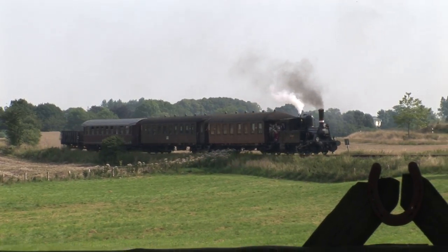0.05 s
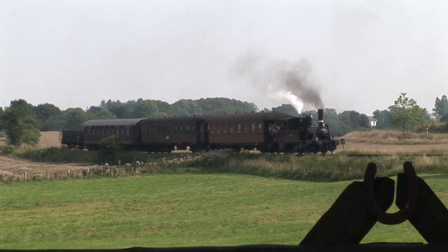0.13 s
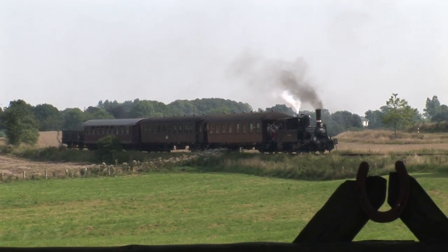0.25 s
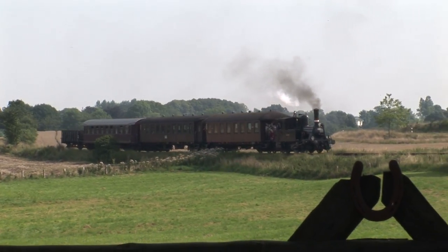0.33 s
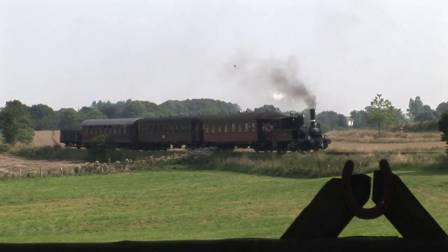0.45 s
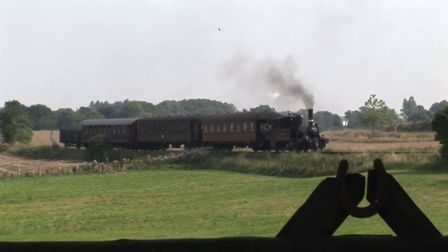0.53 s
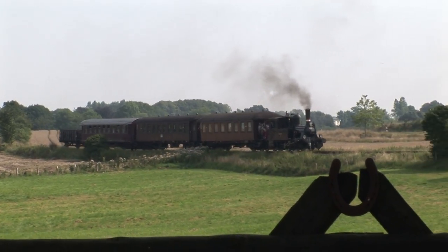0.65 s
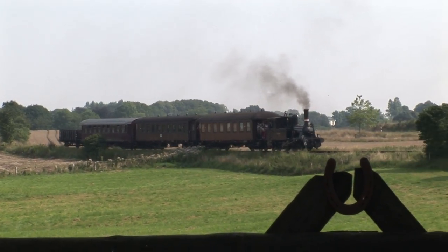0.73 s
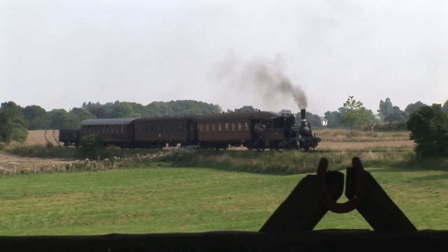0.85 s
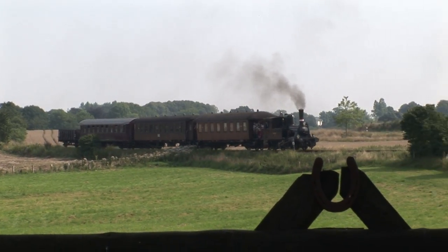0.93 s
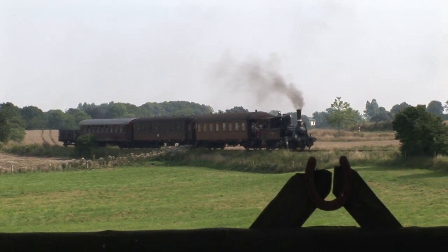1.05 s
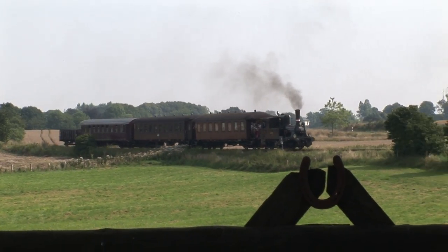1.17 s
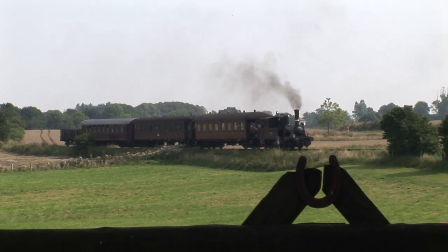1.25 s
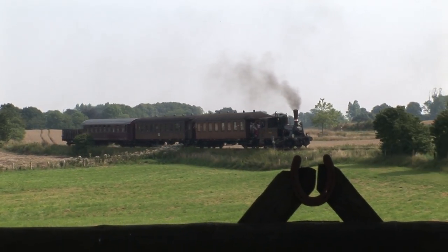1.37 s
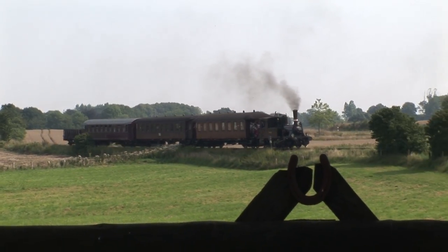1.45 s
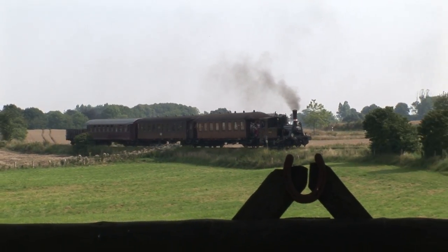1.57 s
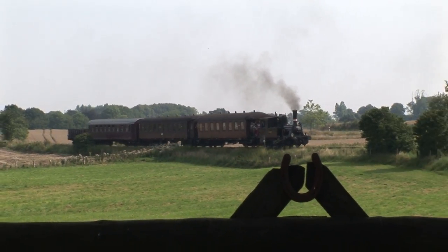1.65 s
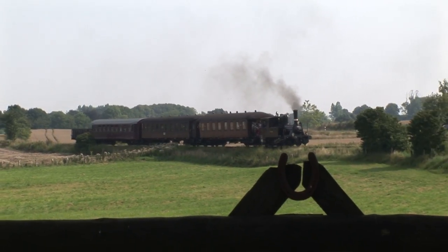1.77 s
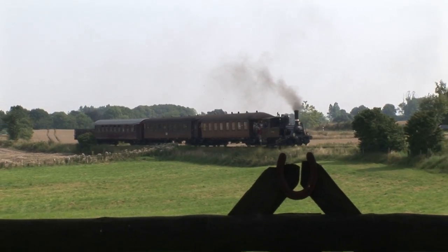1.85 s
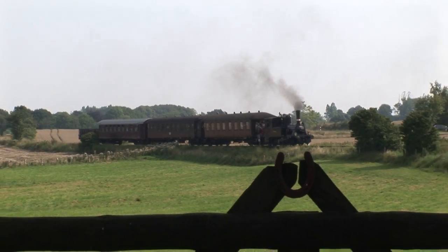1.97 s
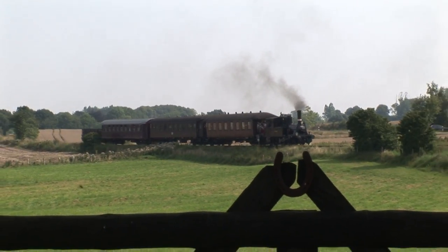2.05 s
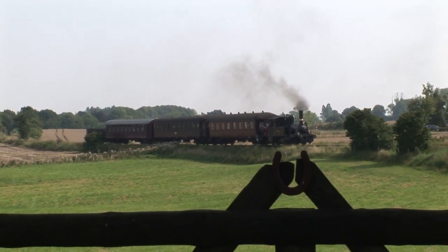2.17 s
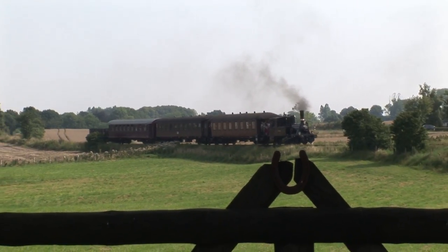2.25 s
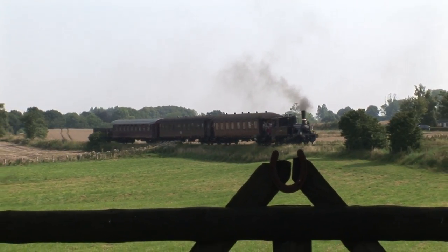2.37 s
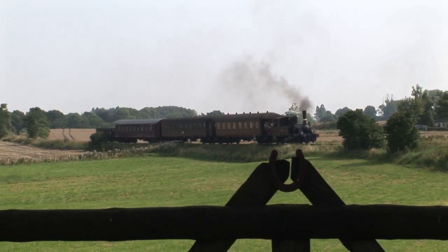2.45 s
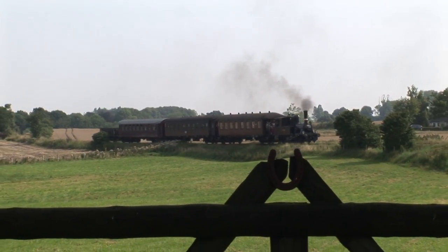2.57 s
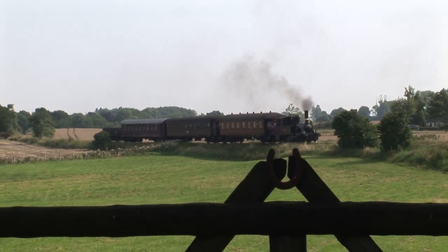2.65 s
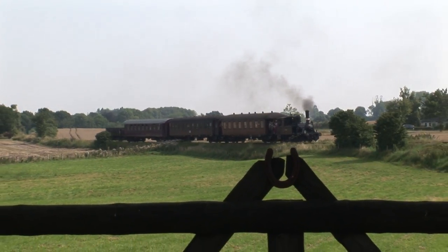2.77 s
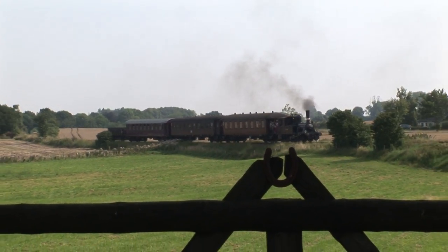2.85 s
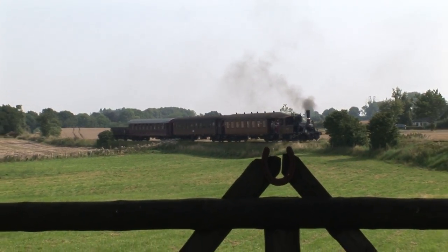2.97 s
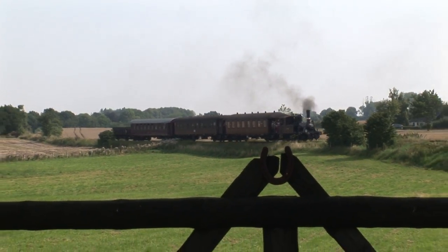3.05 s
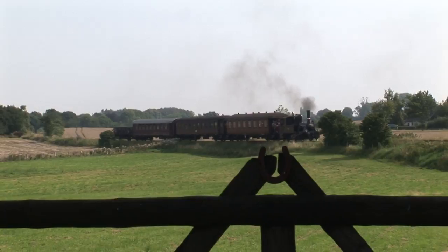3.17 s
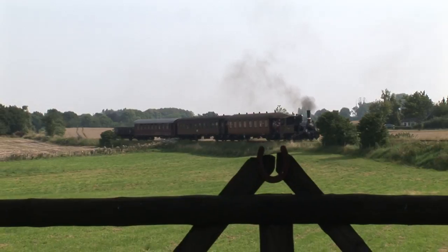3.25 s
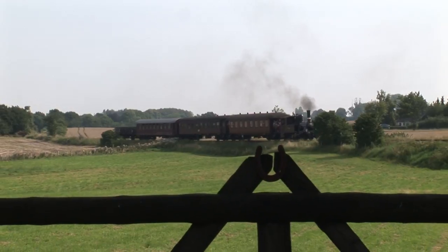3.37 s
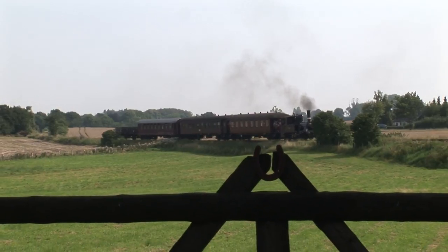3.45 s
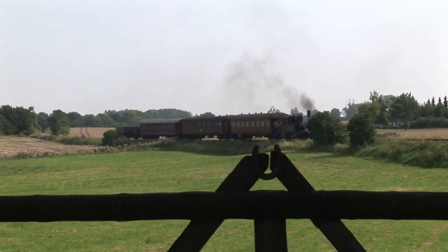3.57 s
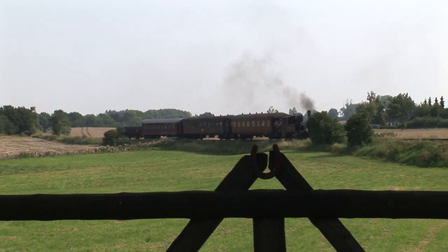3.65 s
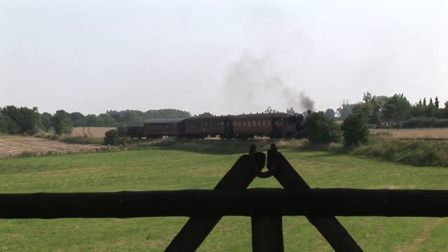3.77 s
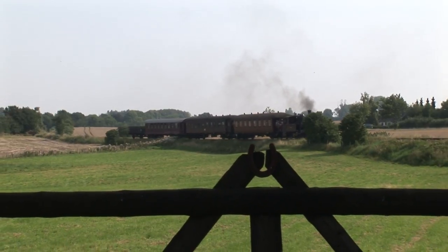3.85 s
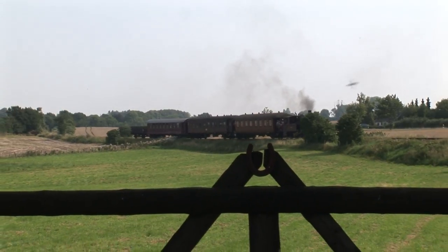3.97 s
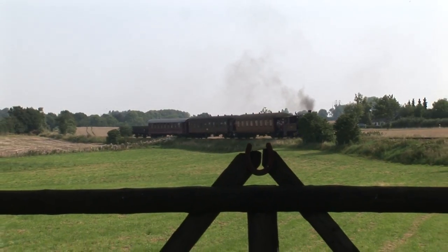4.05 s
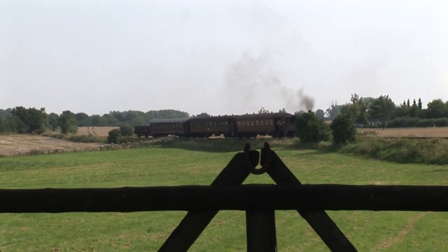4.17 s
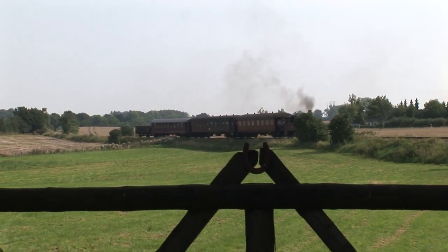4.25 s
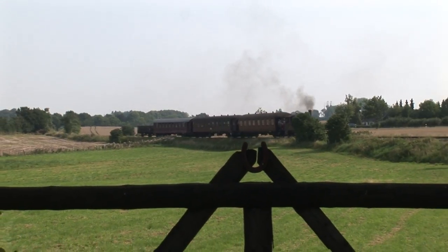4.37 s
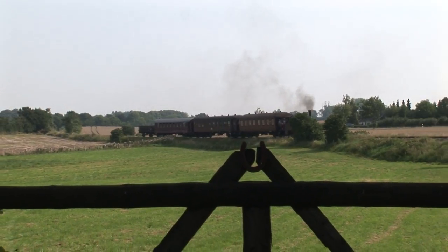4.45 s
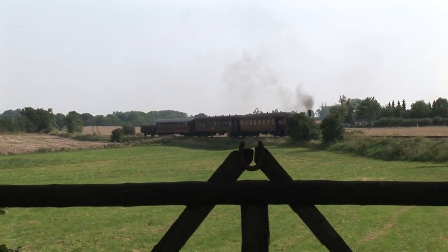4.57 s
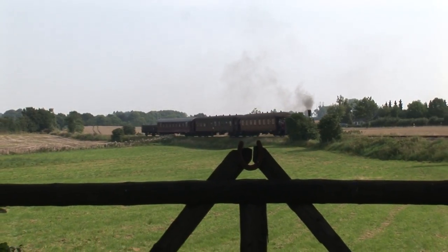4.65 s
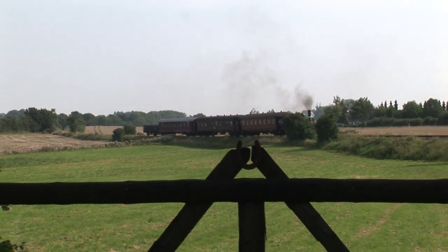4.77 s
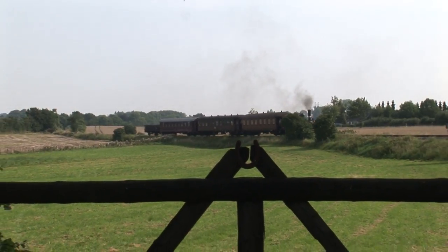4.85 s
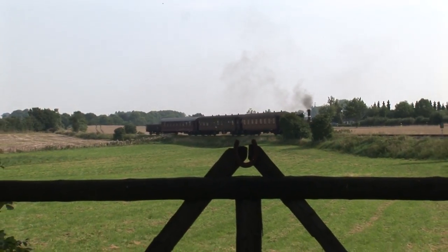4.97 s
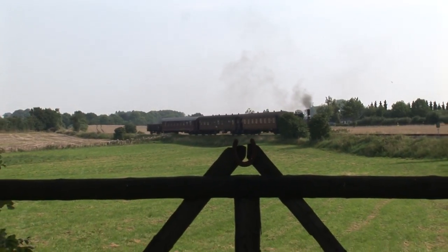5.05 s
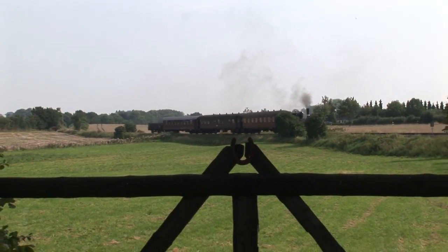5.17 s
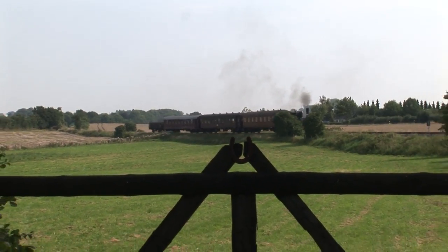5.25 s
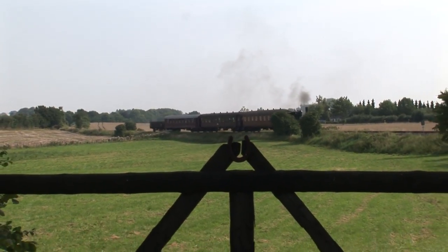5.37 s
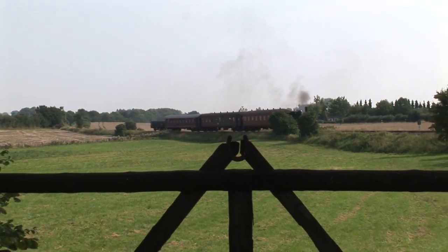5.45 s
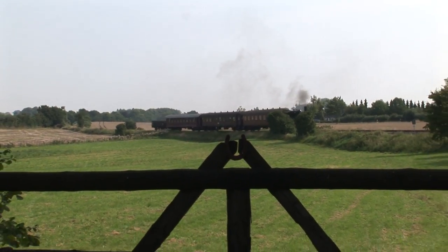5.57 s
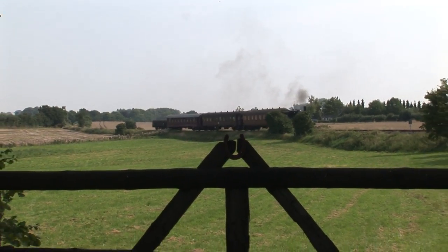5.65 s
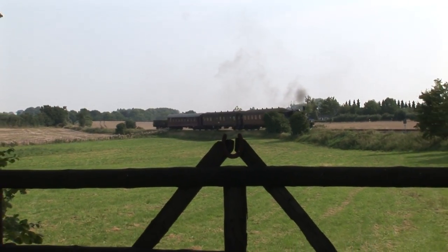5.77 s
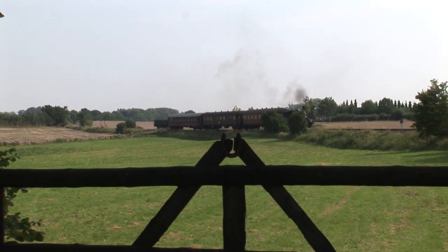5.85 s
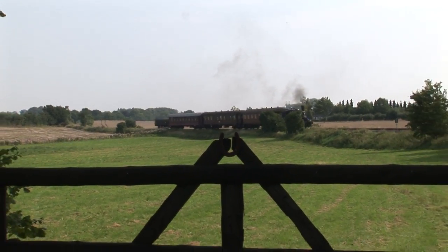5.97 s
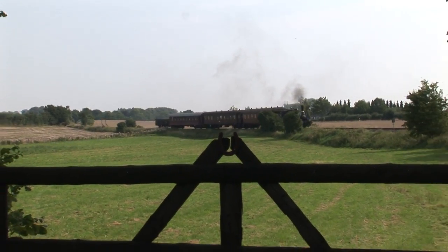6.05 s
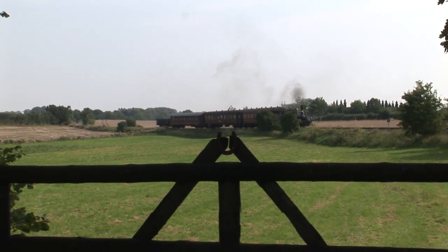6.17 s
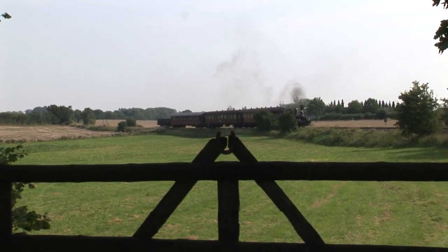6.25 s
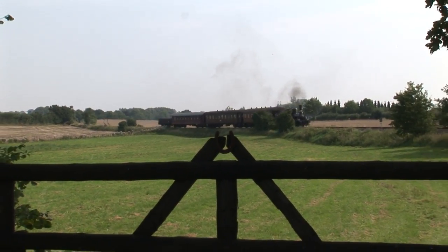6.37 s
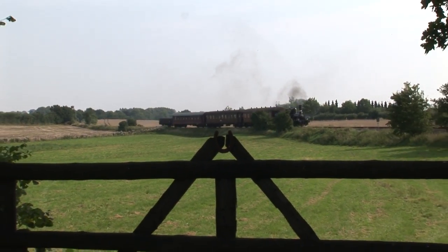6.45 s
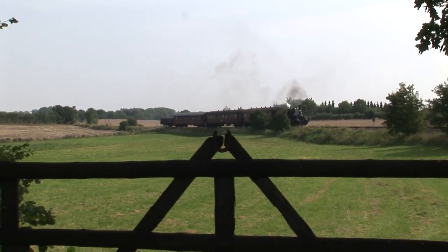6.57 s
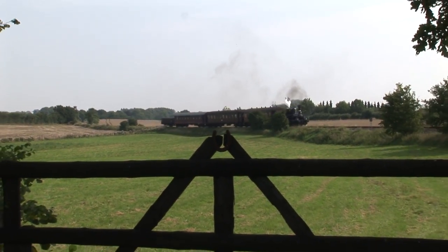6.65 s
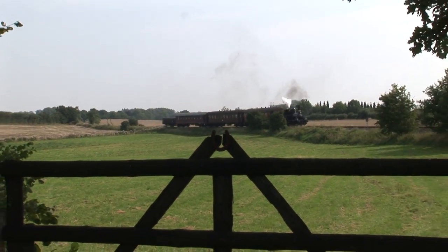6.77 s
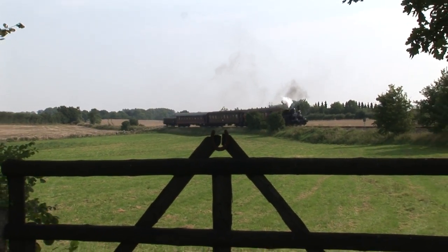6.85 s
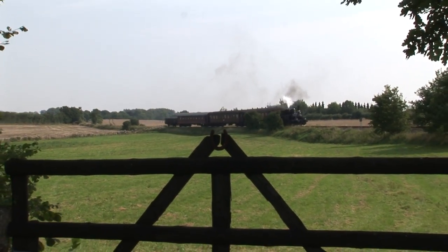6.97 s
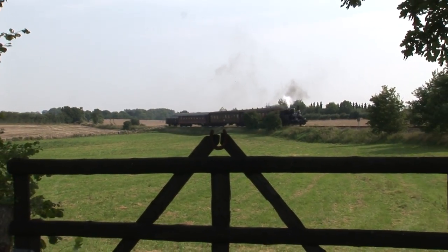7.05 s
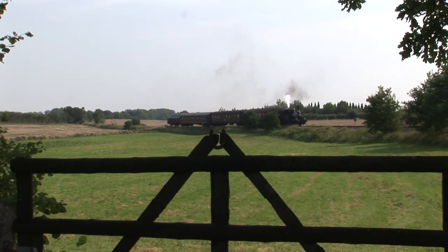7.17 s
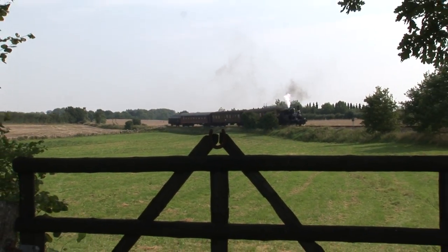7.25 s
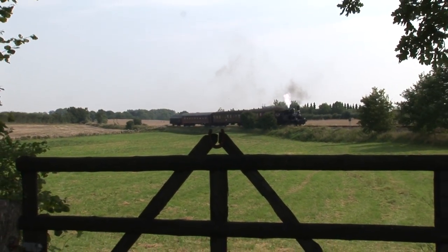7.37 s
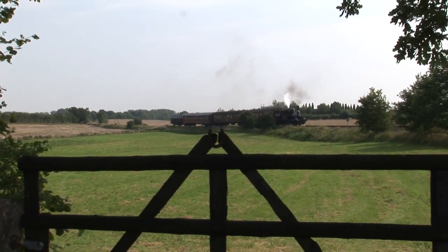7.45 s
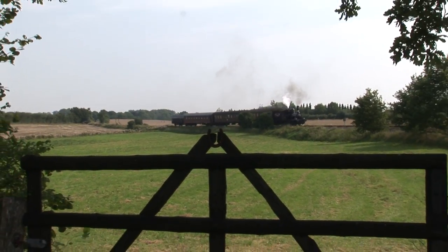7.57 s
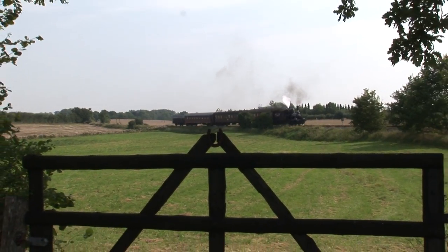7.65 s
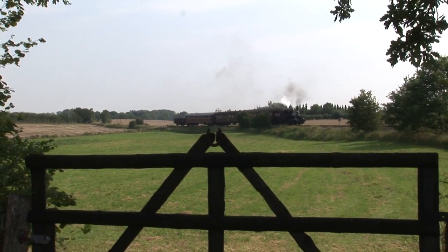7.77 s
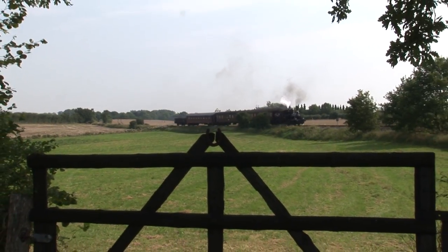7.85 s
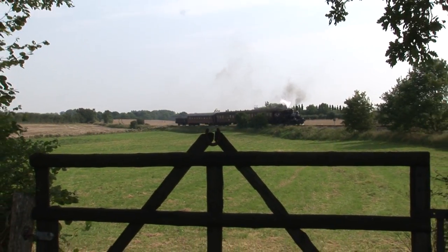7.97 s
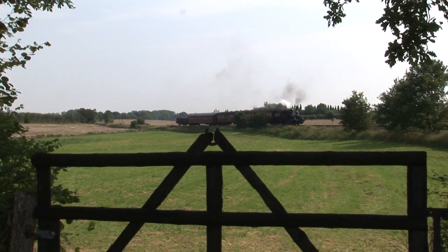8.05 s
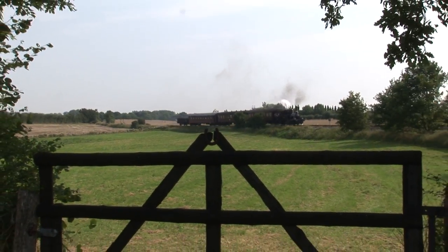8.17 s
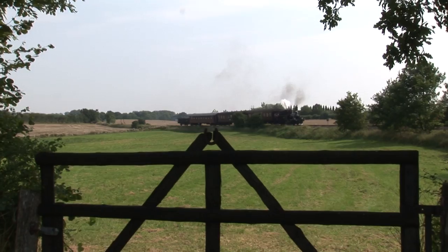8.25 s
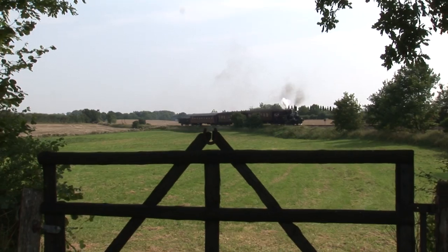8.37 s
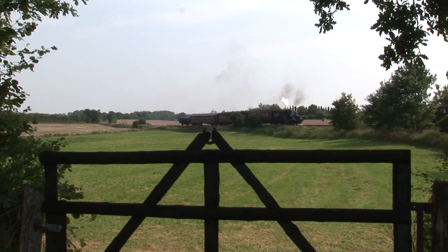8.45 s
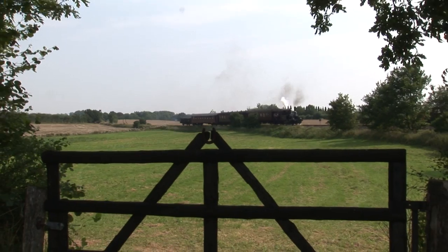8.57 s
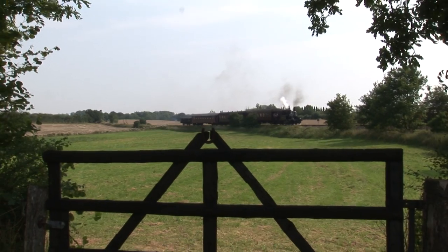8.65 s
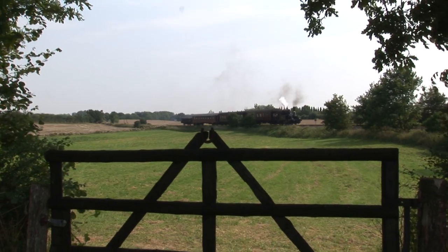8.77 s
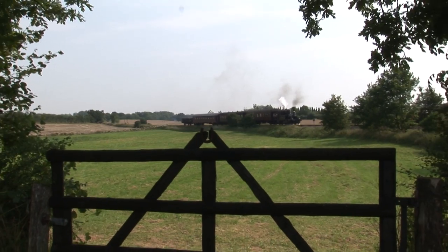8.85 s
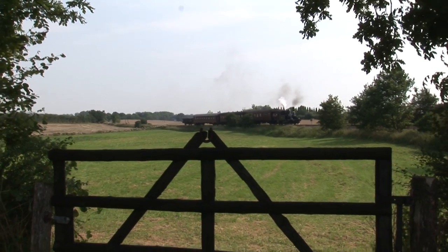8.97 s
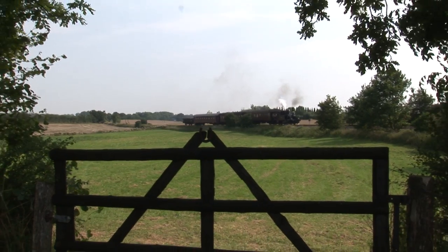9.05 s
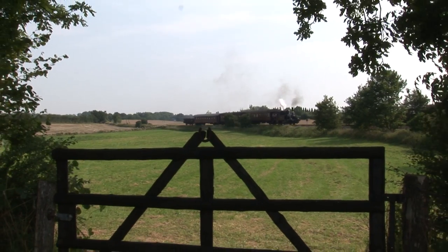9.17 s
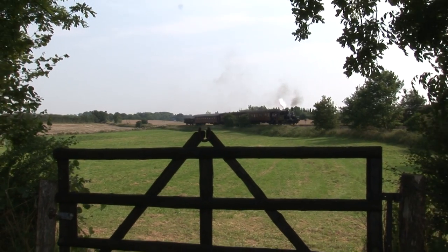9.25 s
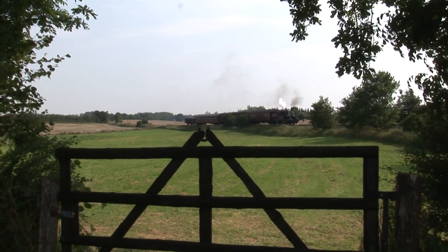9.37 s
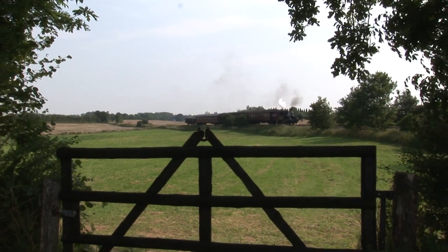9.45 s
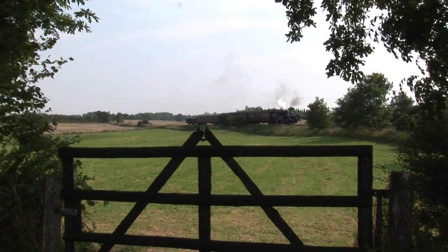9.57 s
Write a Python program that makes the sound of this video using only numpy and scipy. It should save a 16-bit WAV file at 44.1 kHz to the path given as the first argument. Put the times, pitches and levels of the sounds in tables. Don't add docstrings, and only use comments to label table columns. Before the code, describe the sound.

A steam train passes at a distance across open fields, heard through a stereo camera microphone. The tail of a hoarse three-pipe whistle stops abruptly and echoes from hedge and trees. Fast, uneven chuffs, rolling roar, thuds and rail knocks rise into the gap, with a few handling bumps. A steam spit starts a second long whistle, which pushes the train noise down and holds to the end.

```python
import sys
import numpy as np
from scipy import signal
from scipy.fft import rfft, irfft, next_fast_len
from scipy.io import wavfile
from scipy.ndimage import uniform_filter1d, map_coordinates

SR = 44100
rng = np.random.default_rng(int(sys.argv[2]) if len(sys.argv) > 2 else 0)


def to_linear_factor(level_db):
    exponent = np.asarray(level_db, float) / 20
    return 10 ** exponent


def master_out(mix):
    frames = np.transpose(np.atleast_2d(mix))
    ceiling = np.clip(frames, -1, 1)
    pcm = np.round(ceiling * 32767).astype(np.int16)
    wavfile.write(sys.argv[1], SR, pcm)


N = 423801
TIME = np.arange(N) / SR
VALVE_OPENS_S, SPIT_S = 6.5, 6.578
DROPOUT_START_S, DROPOUT_END_S = 4.0855, 4.102


def unit(x):
    return x / np.sqrt(np.mean(x ** 2) + 1e-20)


def along(points, hz):
    f, v = np.transpose(points)
    return np.interp(np.log(hz + 1), np.log(f + 1), v)


def curves(rows, late=0):
    s, *cols = np.transpose(rows)
    return [np.interp(TIME - late, s, c) for c in cols]


def swells(rows):
    s, half, *cols = np.transpose(rows)
    coarse = TIME[::64]
    bells = np.exp(-((coarse[:, None] - s) / half) ** 2)
    return [np.interp(TIME, coarse, bells @ c) for c in cols]


def wobble(rate):
    return map_coordinates(rng.standard_normal(int(N * rate / SR) + 4), [np.arange(N) * rate / SR])


def shape(spectrum):
    return lambda hz: to_linear_factor(along(spectrum, hz))


def hump(centre_hz, width_hz):
    return lambda hz: 1 / (1 + ((hz - centre_hz) / width_hz) ** 2)


def filtered(x, gain):
    m = next_fast_len(N + 8192)
    return irfft(rfft(x, m) * gain(np.fft.rfftfreq(m, 1 / SR)), m)[..., :N]


def rush(gain, alike, patchy_db):
    z = signal.stft(rng.standard_normal((2, N)), nperseg=512)[2]
    field = uniform_filter1d(uniform_filter1d(rng.standard_normal(z.shape[1:]), 6, 0), 14, 1)
    pair = signal.istft(z * to_linear_factor(patchy_db * unit(field)), nperseg=512)[1][:, :N]
    m = next_fast_len(N)
    hz = np.fft.rfftfreq(m, 1 / SR)
    turn = np.arccos(np.clip(along(alike, hz), -1, 1)) / 2
    mid, side = irfft(rfft(pair, m) * gain(hz) * [np.cos(turn), np.sin(turn)], m)[:, :N]
    return unit(np.array([mid + side, mid - side]))


def evened(noise, size, floor):
    return noise / np.sqrt(np.abs(uniform_filter1d(np.mean(noise ** 2, 0), size=size)) + floor)


def puffs(times, levels_db, rise, t60, noise, lead=.015):
    t = np.arange(SR // 4) / SR
    starts = np.zeros(N)
    starts[np.round((times - lead) * SR).astype(int)] = to_linear_factor(levels_db)
    burst = (1 - np.exp(-(t / rise) ** 2)) * to_linear_factor(-60 * t / t60)
    return signal.fftconvolve(starts, burst)[:N] * evened(noise, 1100, 0.056)


def drifting(db, db_per_s, s):
    return db + db_per_s * (s - 3.12)


# time in seconds, lack of steam pressure 0-1, level in dB,
# lean of the jet to the middle pipe in dB.
FIRST_BLAST = [
    (0.0, 0.01, -1.5, 2),
    (.106, .02, -2, 3),
    (.245, 0.03, -0.5, 2),
    (.258, 0.3, 0.5, -4),
    (.282, 1, -7.5, 8.5),
    (.3, 0.7, -41, 4),
]
SECOND_BLAST = [
    (6.545, 0.93, -26, 5),
    (6.561, 0.89, -5.5, -1),
    (6.588, 0.9, 10.5, 4.5),
    (6.611, 0.58, 1.5, -5),
    (6.65, 0.32, -1.5, 7.5),
    (6.9, 0.036, 0, 3),
    (7.2, 0.0, 0.5, -0.5),
    (8.05, 0.024, 0, -2),
    (9.61, 0.016, 0.5, -0.1),
]


def sounding(rows, late=0):
    return (TIME - late < rows[-1][0] + .012) & ((TIME > rows[0][0]) | (rows[0][0] < 1))


# pitch in Hz, level in dB, flattening without pressure as a share,
# its curvature, share of the lean, lateness of speech in seconds.
PIPES = [(510.6, -28.5, .034, .55, -0.013, -0.0002), (679.4, -20.5, .065, .55, 0.98, -0.0019),
         (801.8, -16, .1, 1.05, -0.33, .005)]
# share of the flattening as the valve shuts, extra dB throughout.
CLOSING = [(0.96, 1.5), (0.62, 0.5), (0.97, 0)]


def pipe(rows, late, closing, hz, db, sag, bend, share, lag):
    lack, level_db, lean_db = curves(rows, late + lag)
    part, more_db = closing if rows[0][0] < 1 else (1, 0)
    flattening = part * sag * np.sign(lack) * np.abs(lack) ** bend
    return hz * (1 - flattening), db + more_db + level_db + share * lean_db


def partial(phase, db, breath, rate=60):
    turbulence = 1 + breath * (wobble(rate) + 1j * wobble(rate))
    return np.sqrt(2) * to_linear_factor(db) * np.imag(np.exp(1j * phase) * turbulence)


# time and half length in seconds, shift in Hz, rise in dB.
LOW_SURGE = [(.07, .08, 1, 4.5), (7.08, 0.24, -4, 0), (7.85, .28, 5.5, 2.5), (9.0, 0.81, 0.497, 2.5)]
HIGH_SURGE = [(.16, 0.13, -7, 1), (6.58, 0.018, -10, -0.5), (6.95, 0.103, 5, -0.5)]
# dB relative to the pipe, dB lost while
# pressure builds, lack of pressure that costs it all, drift in dB a second as the train leaves.
STRONG_OVERTONES = [(-7.5, -3, 0.18, -5.5), (-.5, -17.5, 0.18, -1.5), (-13, -30, 0.12, 2),
                    (-17, -2, 0.27, -0.2)]
# time and half length in seconds, dB of low 2nd, low 4th, middle 2nd, high 2nd.
BLOOMS = [(.06, .08, -0.5, -2.5, 0, 3), (.2, .06, 2, -2, 1, -7), (.27, .03, 3, -10, 16, 1),
          (6.72, .1, -1, 8, -6, -1), (6.84, 0.056, 2, 3.5, -5, 2), (7.12, 0.16, 0, 3, 0.5, -2.5),
          (9.05, .2, -3, 1.5, 1.5, 0), (9.5, .15, 1, 0.5, -1.5, 2)]
# time and half length in seconds, dB of low 3rd, low 6th.
WEAK_BLOOMS = [(.12, .15, 2, -4), (6.62, .1, 0, -8), (7.12, 0.16, 10, 5), (7.5, .2, 3, 2),
               (8.0, 0.16, 4, 3), (9.05, .2, -2, 4), (9.5, .15, -3.5, -5)]
# time in seconds, centre in Hz, dB.
NOTCH = [(8.1, 2170, 1), (8.54, 2050, -10), (9.0, 1820, -17), (9.3, 1570, -23), (9.61, 1570, -12)]
# multiple of its pitch, dB relative to the pipe, breathiness.
WEAK_OVERTONES = [
    [(3, -23, 0.24), (5, -20.5, .9), (6, -16, 0.47)],
    [(3, -25.5, 0.28)],
    [(3, -42, 0.3)],
]


def pipes(rows, late=0, doppler=1):
    (low, low_db), (mid, mid_db), (high, high_db) = [pipe(rows, late, c, *p) for c, p in zip(CLOSING, PIPES)]
    surge_hz, surge_db = swells(LOW_SURGE)
    low, low_db = low + surge_hz, low_db + surge_db
    surge_hz, surge_db = swells(HIGH_SURGE)
    high, high_db = high + surge_hz, high_db + surge_db

    lack, level_db, _ = curves(rows, late)
    over_db = 0.97 * np.clip(level_db, 0, None)
    leaving_s = np.clip(TIME - 6.45, 0, None)
    notch_hz, notch_db = curves(NOTCH)
    parents = (low_db, 2 * low), (low_db, 4 * low), (mid_db, 2 * mid), (high_db, 2 * high)
    strong = []
    for (under, lost, built, drift), bloom, (db, hz) in zip(STRONG_OVERTONES, swells(BLOOMS), parents):
        unbuilt_db = lost * np.clip(lack / built, 0, 1)
        ground_db = notch_db * np.exp(-((hz - notch_hz) / 71) ** 2)
        strong.append(db + under - over_db + unbuilt_db + drift * leaving_s + ground_db + bloom)
    low2, low4, mid2, high2 = strong

    phases = [2 * np.pi * np.cumsum(doppler * hz + flutter_hz * wobble(22)) / SR
              for hz, flutter_hz in ((low, 1.24), (mid, 1.205), (high, 3.37))]
    x = partial(phases[0], low_db, breath=0.12)
    x += partial(2 * phases[0], low2 + 1.9, breath=0.086)
    x += partial(4 * phases[0], low4, breath=0.19)
    x += partial(phases[1], mid_db, breath=0.1) + partial(2 * phases[1], mid2, breath=0.1)
    x += partial(phases[2], high_db, breath=0.1) + partial(2 * phases[2], high2, breath=0.14)
    x += partial(phases[1] + phases[2], high_db - 34.0, breath=0.3)

    third_db, sixth_db = swells(WEAK_BLOOMS)
    blooms = [third_db, 0, sixth_db], [0], [0]
    for phase, db, weak, own in zip(phases, (low_db, mid_db, high_db), WEAK_OVERTONES, blooms):
        for (k, under, breath), bloom in zip(weak, own):
            x += partial(k * phase, db + under + bloom + 1.5 * wobble(3), breath, rate=110)
    return x * sounding(rows, late)


def edge_tone(hz):
    band = lambda: wobble(330) + 1j * wobble(330)
    mid, side = np.real(np.exp(2j * np.pi * np.cumsum(hz) / SR) * [band(), 0.14 * band()])
    return unit(np.array([mid + side, mid - side]))


# time and half length in seconds,
# centre and width in Hz, share taken away.
HOLLOWS = [(8.2, 1, 1116, 153, 0.67), (6.74, 0.2, 2700, 230, .7), (9.3, 0.66, 1920, 248, 0.41),
           (8, 0.33, 10500, 730, 0.39), (9.3, 0.43, 4200, 760, 0.29), (7.6, 0.94, 3940, 92, 0.53),
           (7.9, 0.78, 2620, 130, 0.6), (8.0, 0.53, 3350, 121, -.6), (8.9, .15, 5290, 250, -1.1),
           (9.2, .2, 2600, 196, -0.66), (8.4, 0.19, 5300, 200, -0.49), (7, 0.25, 5300, 210, -.5),
           (8.72, 0.13, 3190, 217, 0.61), (6.8, 0.15, 1800, 100, .6), (.12, .15, 1800, 100, .5),
           (7.5, 0.27, 5200, 150, 0.089), (7.48, 0.16, 5600, 220, -0.85), (6.59, .03, 1023, 72, -1.5),
           (6.58, .03, 2250, 150, -.8), (8.68, .1, 4800, 200, .4), (8.45, 0.16, 8700, 2000, -0.094),
           (7.65, .12, 3100, 400, -0.17)]


def hollowed(x):
    f, t, z = signal.stft(x, SR, nperseg=1024)
    gain = 1
    for s, half, hz, width, share in HOLLOWS:
        while_db_free = np.exp(-((t - s) / half) ** 2)
        gain = gain * (1 - min(share, 1) * hump(hz, width)(f)[:, None] * while_db_free)
    return signal.istft(z * gain, SR, nperseg=1024)[1][:, :N]


# frequency in Hz, level in dB per Hz.
JET_ROAR = [(250, -45), (440, -15.5), (560, -2.5), (730, 6.5), (860, 10.5), (960, 4.5), (1150, -0.5),
            (1500, 0.5), (1850, -3), (2200, -26), (3000, -67)]
JET_HISS = [(1400, -25.5), (1900, -2.5), (2200, 4), (2400, -2), (2750, 1.5), (2950, 2), (3400, 0.5),
            (3520, -1), (4000, 1.5), (4500, 0), (5400, -5.5), (6200, -10), (8000, -23), (11000, -47)]
JET_FIZZ = [(2940, -24.5), (5000, -8.5), (5420, -1.5), (6390, -10.5), (8570, -11.5), (10200, -17),
            (12600, -18.5), (15500, -38)]
# frequency in Hz, left-right likeness.
JET_ALIKE = [(60, 1), (150, 1.0), (380, 1.0), (950, 0.93), (2380, 0.83), (5980, 0.76), (15000, 0.84)]
# level in dB, share of the blast's level swing, share of a swell.
JET_PARTS = [(-41, 0.64, 0.057), (-30, 0.53, 0.24), (-31, 0.27, 0.63), (-48, 0.54, 0.96)]
# time and half length in seconds, edge tone in dB, fizz in dB.
TREBLE_SWELLS = [(.13, 0.046, 17, 2), (6.6, 0.034, -9, -5), (6.69, 0.058, 14.5, 0), (6.9, 0.29, 6.5, 4),
                 (7.19, 0.16, 0.5, 5), (7.67, 0.19, 7, 4.5), (8.36, 0.22, 8, 2), (8.62, 0.27, -3.5, 5.5),
                 (9.05, 0.24, -1.5, 2), (9.58, 0.096, 1, 1.5)]
# time in seconds, shift in Hz.
EDGE_DRIFT = [(6.6, 1), (6.7, -39.5), (7.0, 49.5), (7.3, 50.5), (7.9, -21), (8.45, -41), (8.7, 120.5),
              (9.2, 110), (9.61, -10)]


def jets():
    roar = rush(shape(JET_ROAR), JET_ALIKE, patchy_db=2)
    hiss = rush(shape(JET_HISS), JET_ALIKE, patchy_db=1.5)
    fizz = rush(shape(JET_FIZZ), JET_ALIKE, patchy_db=1.6)
    air = rush(hump(centre_hz=12700, width_hz=1300), JET_ALIKE, patchy_db=2.2)
    skirt = to_linear_factor(-11.0) * rush(hump(centre_hz=4900, width_hz=540), JET_ALIKE, patchy_db=3.5)
    edge_swell, fizz_swell = swells(TREBLE_SWELLS)

    handover = np.clip((SPIT_S - TIME) / (SPIT_S - SECOND_BLAST[0][0]), 0, 1) ** 2
    opening = (TIME < SPIT_S) * to_linear_factor(27 * np.minimum(TIME - VALVE_OPENS_S, 0))
    x = opening * (to_linear_factor(-32.5) * hiss + handover * (to_linear_factor(-38) * fizz + to_linear_factor(-51) * air))

    for rows, shy_db in ((FIRST_BLAST, -10), (SECOND_BLAST, 0)):
        lack, level_db, _ = curves(rows)
        part_swells = edge_swell, edge_swell, edge_swell, fizz_swell
        roar_db, hiss_db, edge_db, fizz_db = [db + swing * level_db + share * swell for (db, swing, share), swell
                                              in zip(JET_PARTS, part_swells)]
        edge_hz = 4590 - 170 * lack + curves(EDGE_DRIFT)[0] + 15 * wobble(4)
        blast = to_linear_factor(roar_db + 12.5) * roar + to_linear_factor(hiss_db + 1) * hiss + to_linear_factor(fizz_db + 8) * fizz
        blast += to_linear_factor(edge_db + shy_db - 3.5) * (edge_tone(edge_hz) + skirt)
        blast += to_linear_factor(-64 + 1.9 * fizz_swell + .3 * level_db) * air
        x = x + sounding(rows) * blast

    shut_s, t60 = 0.31, 0.52
    x = x + (TIME > shut_s) * to_linear_factor(-41 - 60 * np.abs(TIME - shut_s) / t60) * hiss
    x = hollowed(x)
    water = rush(hump(centre_hz=1400, width_hz=870), JET_ALIKE, patchy_db=3.0)
    x += puffs(np.array([SPIT_S]), -18, rise=0.0059, t60=0.092, noise=water)
    nearer = rush(hump(centre_hz=2460, width_hz=290), JET_ALIKE, patchy_db=4.0)
    x += np.clip((.28 - TIME) / 0.13, 0, 1) * to_linear_factor(-29.5) * nearer
    return x * to_linear_factor(0.64 * wobble(25))


# frequency in Hz, left-right likeness.
ALIKE = [(60, 1), (150, 1), (380, 0.98), (950, 1), (2380, 0.93), (5980, 0.69), (15000, 0.56)]
# frequency in Hz, level in dB per Hz.
CAMERA = [(3000, -30), (8000, -12), (12500, 5), (14500, -7), (15600, -24)]


def camera_hiss():
    return to_linear_factor(-61) * rush(shape(CAMERA), ALIKE, patchy_db=.3)


# time in seconds, level in dB.
ROAR_LEVEL = [(.8, -30.5), (.99, -33), (1.9, -31), (3.46, -31), (5.69, -30.5), (6.45, -28.5)]
# frequency in Hz, level in dB per Hz.
ROAR = [(150, -39), (260, -9), (298, -15.5), (399, -13), (473, -8.5), (643, -4.5), (701, -3.5), (831, -1),
        (987, -3.5), (1170, -3), (1540, -4.5), (1730, -3), (2480, -12), (4600, -19), (15500, -43)]
# time and half length in seconds, rise in dB.
LEAKS = [(1.9, 0.75, 10.7), (5.8, 0.55, 4.5)]


def running_noise():
    x = to_linear_factor(curves(ROAR_LEVEL)[0] + 0.5 + .7 * wobble(14)) * rush(shape(ROAR), ALIKE, patchy_db=0.9)
    leak = rush(hump(centre_hz=4940, width_hz=1700), ALIKE, patchy_db=4.0)
    x += to_linear_factor(swells(LEAKS)[0] - 55) * leak
    rails = rush(hump(centre_hz=3010, width_hz=540), ALIKE, patchy_db=4.0)
    x += to_linear_factor(drifting(-49, 3.5, np.minimum(TIME, VALVE_OPENS_S))) * rails
    wheels = rush(hump(centre_hz=1728, width_hz=48), ALIKE, patchy_db=3.5)
    return x + to_linear_factor(-44.5 + 2.2 * wobble(5.63)) * wheels


# frequency in Hz, level in dB per Hz.
RUMBLE = [(12, -60), (20, -42), (37, -42), (75, -12.5), (150, 1.5), (214, -3), (296, -28.5), (400, -21),
          (520, -47), (880, -120)]
# frequency in Hz, left-right likeness.
PORTS = [(30, .1), (60, .9), (150, .965), (400, .96)]
# time in seconds, level in dB.
THUDS = [(0.434, -34.5), (0.91, -31), (1.184, -29.5), (1.499, -33.5), (1.669, -33), (1.92, -34),
         (2.187, -31.5), (2.906, -38), (3.093, -44), (3.745, -39), (4.071, -26), (4.26, -26), (4.541, -34),
         (4.841, -33), (5.021, -30), (5.241, -29), (5.446, -32), (5.86, -28.5), (6.17, -28)]


def rumble():
    passing = np.minimum(TIME, VALVE_OPENS_S)
    x = to_linear_factor(drifting(-39, 1.38, passing)) * rush(shape(RUMBLE), PORTS, patchy_db=2.0)
    s, db = np.transpose(THUDS)
    ground = rush(shape(RUMBLE), PORTS, patchy_db=2.5)
    return x + puffs(s, db + 2.5, rise=0.0092, t60=0.26, lead=0.019, noise=ground)


# time and half length in seconds, rise in dB.
GUSTS = [(1.31, 0.027, 6), (1.86, 0.074, 12.5), (2.67, 0.065, 11), (3.2, 0.063, 12.5), (3.45, .06, 12),
         (3.95, .05, 8), (4.13, 0.045, 12), (4.42, 0.13, 10.5), (4.63, 0.1, 9), (4.9, .05, 5),
         (5.06, 0.05, 9.5), (5.23, 0.086, 15.5), (5.485, 0.04, 14), (5.545, .015, 8), (5.71, .03, 9),
         (6.0, 0.15, 11), (6.16, 0.047, 2), (6.28, 0.033, 8), (6.4, 0.027, 11.5), (6.51, 0.034, 11.5)]


def chimney():
    ring = rush(hump(centre_hz=664.6, width_hz=27.6), ALIKE, patchy_db=-2.5)
    passing = np.minimum(TIME, VALVE_OPENS_S)
    return to_linear_factor(drifting(-46.5, 3, passing) + swells(GUSTS)[0]) * evened(ring, 1500, .15)


# frequency in Hz, dB.
HEDGE = [(300, -30), (500, -12), (660, -22), (790, -17), (1000, -22), (2000, -20), (4000, -40)]


def hedge():
    near = pipes(FIRST_BLAST, late=.27, doppler=.992) * to_linear_factor(2 * wobble(20) - 5)
    return filtered(near * np.clip((TIME - .27) / .04, 0, 1), shape(HEDGE))


# start in seconds, dB of each of the four exhaust beats.
TURNS = [(.415, -3.5, -7, -9, -11), (0.853, -3, -6.5, -11, -12), (1.294, -1, -2.5, -12, -4),
         (1.734, -0.5, -4, -2, -18), (2.179, 2.5, -1.5, 1.5, -9), (2.623, 3, -2, -5, -16),
         (3.067, -3, 0.5, -5.5, -36), (3.514, -8, -2, 0, -3), (3.97, 1, -25, -25, -23),
         (4.125, 0, -8, -4, -14), (4.554, 2, -23, -5, -4), (5.005, 1.5, -7, 2, -6),
         (5.462, -4, -1, -2, -2.5), (5.912, 4.5, -13, 0, -3), (6.39, 0, -17, -15, -17)]
GAIT = [(0, .118, .235, .345), (0, .113, .257, .372)]
# dB as the train passes square, drift in dB a second.
BEAT_PARTS = [(-30.5, 0.94), (-33, -2.5), (-40, -1.2)]
# frequency in Hz, level in dB per Hz.
PUFF = [
    [(400, -24), (700, 5), (900, 3), (1250, 5), (1500, -4.5), (2200, -40)],
    [(900, -38), (1300, -5), (1750, -1), (2100, -5), (2500, -19), (3500, -44)],
    [(1800, -49), (2500, 1), (3300, -2.5), (5000, -8.5), (8000, -41), (15000, -30)],
]


def exhaust_beats():
    start, *db = np.transpose(TURNS)
    s = start[:, None] + np.array(GAIT)[1 * (start > DROPOUT_START_S)]
    s, db = s.ravel(), np.transpose(db).ravel()
    x = 0
    for rule, part in zip(BEAT_PARTS, PUFF):
        own_db = 1.5 * rng.standard_normal(len(s))
        noise = rush(shape(part), ALIKE, patchy_db=1.5)
        x = x + puffs(s, db + drifting(*rule, s) + own_db + 4.8, rise=.005, t60=.17, noise=noise)
    return x


# frequency in Hz, dB.
WOOD = [(300, -24), (490, -12.5), (655, -11), (775, -17), (1000, -18), (1310, -10), (1600, -18),
        (2000, -11), (4000, -40)]
# time and half length in seconds, rise in dB.
TREES = [(.32, 0.06, 8), (.46, 0.036, 3), (.6, 0.053, 2), (.73, 0.031, 2.5), (.84, .03, 9)]


def wood():
    near = pipes(FIRST_BLAST, late=.468, doppler=.972) * to_linear_factor(2.5 * wobble(30) - 4.5)
    far = pipes(FIRST_BLAST, late=.56, doppler=.972) * to_linear_factor(2 * wobble(25) - 13)
    return filtered((near + far) * to_linear_factor(swells(TREES)[0]), shape(WOOD)) * to_linear_factor([[1.5], [-1.5]])


# time in seconds, low part in dB, treble part in dB.
SHORT_PUFFS = [(.852, -39, -50), (1.871, -39, -36), (2.178, -42, -39), (2.21, -35, -38), (2.32, -40, -44),
               (2.85, -36, -40), (3.067, -44, -35), (3.139, -36, -53), (3.52, -25.5, -39), (4.804, -37, -37),
               (5.115, -49, -38), (5.464, -33, -44), (5.495, -30, -43), (5.714, -52, -35.5), (6.209, -27, -36),
               (6.282, -38, -34)]


def short_puffs():
    s, *parts_db = np.transpose(SHORT_PUFFS)
    x = 0
    for db, part in zip(parts_db, PUFF[::2]):
        x = x + puffs(s, db + 4.8, rise=.004, t60=.15, noise=rush(shape(part), ALIKE, patchy_db=1.5))
    return x


# time in seconds, peak in dB.
CRACKS = [(1.282, -20), (1.725, -19), (2.286, -21), (2.399, -14), (2.613, -14), (2.731, -24), (2.841, -14),
          (3.056, -19), (3.509, -17), (4.542, -15), (4.997, -17), (5.4515, -10), (5.704, -16), (5.901, -15),
          (6.207, -11)]


def cracks():
    s, db = np.transpose(CRACKS)
    snap = rush(hump(centre_hz=1200, width_hz=800), ALIKE, patchy_db=-2)
    return puffs(s, db - 12, rise=.0012, t60=.05, lead=0.0009, noise=snap)


# time in seconds, level in dB, pitch in Hz, t60 in seconds, scrape share.
BUMPS = [
    (4.071, -21, 234, 0.053, 1.9),
    (4.228, -22.5, 150, 0.17, 0.92),
    (4.256, -24, 111, .12, .3),
    (4.836, -11, 170, .06, 0.12),
]


def bumps():
    x, t = np.zeros((2, N + SR)), np.arange(SR // 4) / SR
    band = signal.butter(2, [120 / SR * 2, 600 / SR * 2], "bandpass", output="sos")
    for s, db, hz, t60, scrape in BUMPS:
        rub = rng.standard_normal(len(t)) + 0.7 * rng.standard_normal((2, len(t)))
        knock = np.sin(2 * np.pi * hz * t) + scrape * unit(signal.sosfilt(band, rub))
        envelope = to_linear_factor(db - 60 * t / t60) * (1 - np.exp(-t / 0.0028))
        x[:, round(s * SR):][:, :len(t)] += 1.2 * envelope * knock
    return filtered(x[:, :N], lambda hz: 1 / (1 + (70 / (hz + 1)) ** 4))


# time in seconds, gain in dB.
GAIN = [(0, -11.5), (.3, -10.5), (.34, -7), (.38, -2.5), (.43, 1.5), (.55, 0.5), (6.57, -0.5), (6.6, -15),
        (6.75, -15.5), (7.6, -22), (8.6, -22.5), (9.61, -18.5)]


def scene():
    sway_db = 0.5 * wobble(23) * [[1], [-1]]
    whistle = to_linear_factor(sway_db) * (pipes(FIRST_BLAST) + pipes(SECOND_BLAST)) + jets()
    train = running_noise() + rumble() + chimney() + exhaust_beats() + short_puffs()
    ducked = camera_hiss() + to_linear_factor([[.2], [-.2]]) * train + hedge() + wood() + cracks() + bumps()
    return whistle + to_linear_factor(curves(GAIN)[0]) * ducked


def top_cut(x):
    return signal.sosfilt(signal.butter(12, 15600, fs=SR, output="sos"), x)


def record(dry):
    gap = uniform_filter1d(1. * ((TIME > DROPOUT_START_S) & (TIME < DROPOUT_END_S)), size=40)
    x = dry * np.clip(TIME / 0.0014, 0, 1) * (1 - gap * (1 - to_linear_factor(-35)))
    x = x / (1 + np.abs(x / .99) ** 12) ** (1 / 12)
    return top_cut(x)


dry = scene()
out = record(dry)
master_out(out)
```